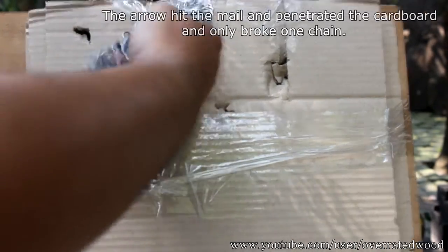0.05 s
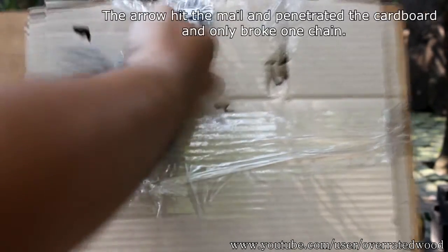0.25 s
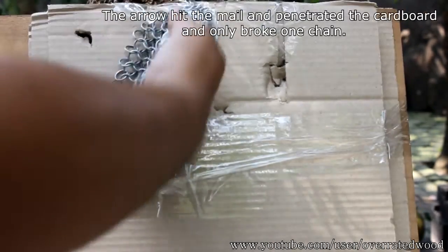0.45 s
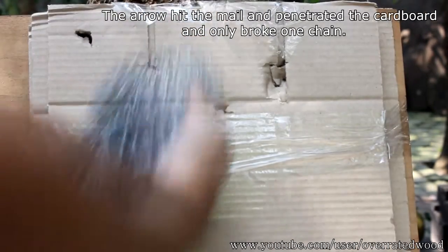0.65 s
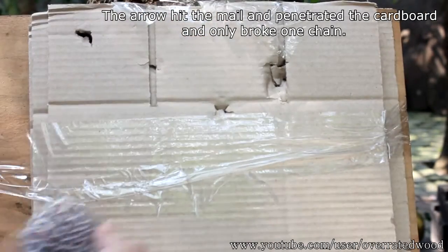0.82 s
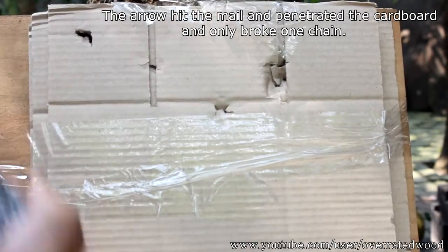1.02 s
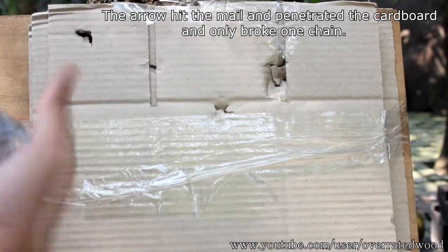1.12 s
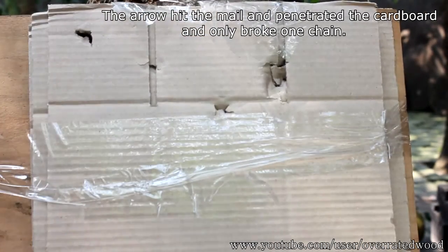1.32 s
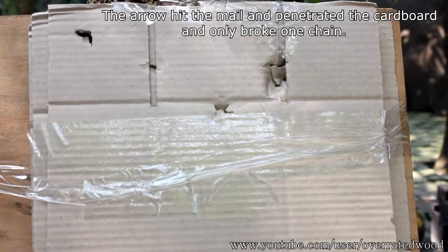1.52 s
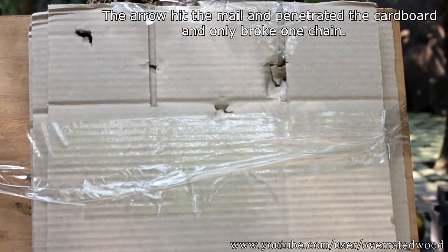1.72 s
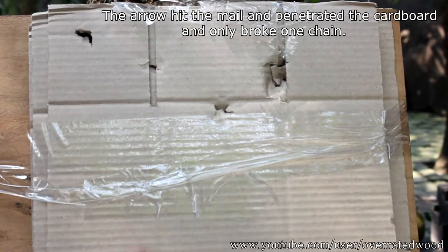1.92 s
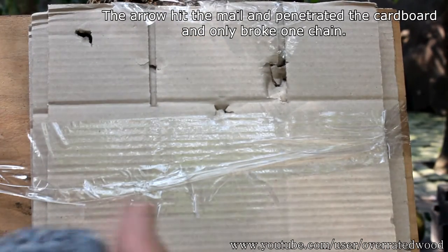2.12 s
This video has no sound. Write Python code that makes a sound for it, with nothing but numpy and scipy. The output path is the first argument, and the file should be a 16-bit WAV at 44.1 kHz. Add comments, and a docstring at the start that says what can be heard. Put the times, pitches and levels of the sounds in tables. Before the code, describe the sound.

Steel ring mesh dragged from cardboard, rasping, knocking and snapping free, then bright metallic jingling

```python
"""Chainmail dragged off a card target

Outdoors, with the microphone close to a hand that drags a piece of chainmail off a cardboard target.
Steel rings scrape (clumped grains over hiss) and snag (short noise bursts) on the card, which gives one
heavy thump among small knocks (damped modes) as the mail tears free. Then the mail jingles (struck ring
modes, ticks and hiss) in the hand as it is carried away. Far off, traffic rumbles and an engine hum fades."""
import sys
import numpy as np
from scipy import signal
from scipy.fft import rfft, irfft, next_fast_len
from scipy.io import wavfile
from scipy.ndimage import map_coordinates

SR = 44100
rng = np.random.default_rng(int(sys.argv[2]) if len(sys.argv) > 2 else 0)


def generate_wav(sig):
    """Save sig (samples, or channels by samples) to the path in sys.argv[1] as 16-bit PCM at SR."""
    pcm = np.round(np.clip(np.atleast_2d(sig).T, -1, 1) * 32767).astype(np.int16)
    wavfile.write(sys.argv[1], SR, pcm)


def boost(x):
    """Linear amplitude factor 10**(x/20) for a level x in decibels (scalar or array-like)."""
    u = np.asarray(x, float) / 20
    return 10 ** u


N = 94815
TOP_HZ = 15800  # upper edge of the band


def unit(x):
    """Scaled to rms 1."""
    return x / np.sqrt(np.mean(x ** 2) + 1e-20)


def coloured(x, points):
    """Minimum-phase filter: x shaped by (Hz, dB) points on a log frequency axis, with no pre-ringing."""
    m = 2 * next_fast_len(N // 2 + 4096)
    hz, db = np.transpose(points)
    log_hz = np.log(np.fft.rfftfreq(m, 1 / SR) + 1)
    log_gain = np.interp(log_hz, np.log(hz), db) * np.log(10) / 20
    # folding the cepstrum onto positive time makes the filter causal
    cepstrum = irfft(log_gain, m)
    cepstrum[1:m // 2] *= 2
    cepstrum[m // 2 + 1:] = 0
    return irfft(rfft(x, m) * np.exp(rfft(cepstrum)), m)[:N]


def wobble(rate):
    """A smooth random curve through normal-distributed knots, rate knots a second."""
    knots = rng.standard_normal(int(N * rate / SR) + 4)
    return map_coordinates(knots, [np.arange(N) * rate / SR])


def swell(start, rise, hold, release):
    """Rise, hold and exponential release, peak 1; times in seconds, release per 20 dB."""
    t = np.arange(N) / SR - start
    up = np.clip(t / rise, 0, 1) ** 1.5
    return up * np.exp(-np.log(10) * np.clip(t - rise - hold, 0, None) / release)


def damped_modes(start_s, hz, gain, t60, size, attack_s=.0001):
    """Struck resonances: a sum of exponentially damped sines, each cut to size samples."""
    t = np.arange(size) / SR
    decay = boost(-60 * t / t60[:, None])
    attack = 1 - np.exp(-t / attack_s)
    rows = gain[:, None] * decay * attack * np.sin(2 * np.pi * hz[:, None] * t)
    at = np.round(start_s * SR).astype(int)[:, None] + np.arange(size)
    return np.bincount(at.ravel(), rows.ravel(), N + size)[:N]


def contacts(per_s, spread_db):
    """Tiny collisions at random moments, either sign, their sizes scattered in dB."""
    count = int(per_s * N / SR)
    at = rng.uniform(0, N - 1, count).astype(int)
    size = boost(spread_db * rng.standard_normal(count))
    return at, size * rng.choice([-1, 1], count)


# Spectrum of the open air around the microphone. Each row: frequency in Hz, relative density in dB per Hz.
AIR_SPECTRUM = [(15, -65), (30, -24), (100, -4), (145, -3), (270, -6), (450, -13), (900, -16), (1950, -25),
                (9000, -39), (12000, -80)]
AIR_DB = -42  # rms, about which the level wobbles
HUM_HZ, HUM_HALF_WIDTH_HZ = 84.4, 12  # half amplitude this far from the centre
HUM_START_DB, HUM_FADE_DB_PER_S = -43.5, 14


def air():
    """Far rumble and outdoor hiss, a little unsteady, with the narrow-band hum of a far engine moving off."""
    m = next_fast_len(N)
    resonance = 1 / (1 + ((np.fft.rfftfreq(m, 1 / SR) - HUM_HZ) / HUM_HALF_WIDTH_HZ) ** 2)
    hum = unit(irfft(rfft(rng.standard_normal(m)) * resonance, m)[:N])
    hum = hum * boost(HUM_START_DB - HUM_FADE_DB_PER_S * np.arange(N) / SR)
    rumble = unit(coloured(rng.standard_normal(N), AIR_SPECTRUM))
    return hum + boost(AIR_DB + .9 * wobble(6.2)) * rumble


YARD_DB, YARD_T60_S = -17.5, 0.082


def yard(near):
    """Short answer from the ground and walls: a decaying noise tail that starts 2 ms after each sound."""
    t = np.arange(SR // 5) / SR
    tail = rng.standard_normal(len(t)) * boost(-60 * t / YARD_T60_S) * (t > .002)
    tail = tail / np.linalg.norm(tail)
    return boost(YARD_DB) * signal.fftconvolve(near, tail)[:N]


# Knocks on the card panel. Each row: start in seconds, relative level in dB.
KNOCKS = [(.2445, -19), (.3393, 5), (0.3562, -16), (.429, -20.5), (.7555, -15), (.764, -15)]
# Modes of the card panel. Each row: frequency in Hz, relative level in dB, decay by 60 dB in seconds.
PANEL_MODES = [(312.4, -12, 0.11), (432, 4.5, 0.022), (547, -7, .025), (790, -16.5, 0.056),
               (1100, -14.5, 0.038), (2060, -20, .02)]
# A small panel radiates little bass. Each row: frequency in Hz, gain in dB.
PANEL_BASS_LOSS = [(30, -24), (120, -6), (230, -4), (330, 0)]


def thumps():
    """Each knock pulls the panel in first (negative swing) and lets its modes ring."""
    rows = [(s, hz, knock_db + mode_db, t60)
            for s, knock_db in KNOCKS for hz, mode_db, t60 in PANEL_MODES]
    s, hz, db, t60 = np.transpose(rows)
    ringing = damped_modes(s, hz, boost(db - 4.5), t60, size=4000, attack_s=0.0011)
    return coloured(-ringing, PANEL_BASS_LOSS)


# Rings dragged over the card. Each row: start in seconds, rise in seconds, hold in seconds,
# level of the scrape band in dB, scrape pitch in Hz.
STROKES = [(0, .01, .045, -41, 2000), (.06, .02, .14, -50, 1500), (0.199, 0.044, .045, -37, 1500),
           (0.294, .015, 0.036, -32, 2500), (.346, .005, .005, -27, 1800), (.362, .004, .01, -34.5, 1200),
           (.398, .01, .065, -43, 1500), (.495, .01, .09, -48, 2500), (.592, .03, .011, -27, 3800),
           (0.637, .005, .014, -28.5, 3500), (.66, .03, .045, -35, 2200), (.725, 0.028, .035, -30, 2400),
           (.80, 0.0055, .035, -41, 2500), (0.865, .002, .01, -40, 2600), (0.918, .002, .022, -44, 2500),
           (1.158, .003, 0.023, -47, 4500)]
# Drumming of the card under a stroke. Each row: frequency in Hz, relative level in dB.
CARD_DRUMMING = [(180, -32.5), (300, -6.5), (450, 0.5), (650, -1.5), (1000, -7), (1800, -17)]
SCRAPES_PER_S, SCRAPE_SPREAD_DB, SCRAPE_HISS = 2500, 4.5, .9  # hiss is rms against grains at 1
SCRAPE_OCTAVES, SCRAPE_SKIRT_DB = .85, -20  # width of the band around the pitch; broad skirt above it
STROKE_RELEASE_S = .028  # per 20 dB
# drumming against the scrape band at the pivot pitch; light, bright strokes drum less
DRUM_DB, DRUM_DB_PER_OCTAVE, DRUM_PIVOT_HZ = 3.5, -9, 2000


def scrape():
    """Clumped grains over hiss, coloured stroke by stroke; the same drag drums the card."""
    at, size = contacts(SCRAPES_PER_S, SCRAPE_SPREAD_DB)
    grains = unit(np.bincount(at, size, N))
    hiss = SCRAPE_HISS * rng.standard_normal(N)
    rub = boost(2.4 * wobble(120)) * (grains + hiss)
    drum = unit(coloured(rub, CARD_DRUMMING))
    out = np.zeros(N)
    m = 2 ** 14  # samples given to one stroke
    f = np.fft.rfftfreq(m, 1 / SR) + 1
    for s, rise, hold, db, hz in STROKES:
        span = slice(int(s * SR), int(s * SR) + m)
        peak = np.exp(-.5 * (np.log2(f / hz) / SCRAPE_OCTAVES) ** 2)
        skirt = boost(SCRAPE_SKIRT_DB) * f ** 2 / (f ** 2 + hz ** 2)
        rasp = unit(irfft(rfft(rub[span]) * (peak + skirt), m))
        drum_db = DRUM_DB + DRUM_DB_PER_OCTAVE * np.log2(hz / DRUM_PIVOT_HZ)
        stroke = boost(db) * swell(s, rise, hold, STROKE_RELEASE_S)[span]
        out[span] += stroke * (rasp + boost(drum_db) * drum[span])
    return out


# A ring snags on the card and snaps free. Each row: start in seconds, peak in dB, centre frequency in Hz.
SNAPS = [(.0358, -19, 12000), (0.0383, -15, 4500), (.0512, -13, 6960), (.176, -21.5, 3970),
         (.239, -13, 11000), (0.2454, -10.5, 2930), (.352, -13, 2500), (.3541, -2.5, 2080),
         (.4248, -17, 1500), (.471, -22, 2500), (0.4795, -20, 5500), (.5175, -29, 4500), (0.56, -16, 4200),
         (.570, -20, 4000), (.5805, -19, 11000), (.588, -23, 13000), (.595, -22, 2000), (0.6059, -6, 9100),
         (0.6122, -11, 4970), (0.6194, -9, 4500), (0.6254, -7.5, 4000), (0.6316, -7, 3570),
         (.6398, -11, 10000), (.642, -6, 4000), (.6427, 0.5, 10000), (0.6487, -3.5, 4700),
         (0.7253, -12, 11100), (.734, -16, 3400), (0.784, -13, 8100), (0.814, -18, 6000), (.868, -14, 1500),
         (.872, -19, 6000), (0.9216, -15, 4000), (.939, -21, 6000), (1.0934, -8, 13000),
         (1.0966, -10, 12000), (1.16, -24, 4200), (1.3455, -14, 9450)]
SNAP_T60_S = .0038


def snags():
    """Each snap is a burst of noise, a few milliseconds long, around its own pitch."""
    out = np.zeros(N + SR)
    t = np.arange(800) / SR
    f = np.fft.rfftfreq(len(t), 1 / SR) + 1
    shape = boost(-60 * t / SNAP_T60_S) * (1 - np.exp(-t / .0002))
    for s, db, hz in SNAPS:
        tone = .35 + np.exp(-(np.log(f / hz) / 0.41) ** 2)
        noise = rfft(rng.standard_normal(len(t)))
        burst = shape * irfft(noise * tone * (f > 900), len(t))
        out[round(s * SR):][:len(t)] += boost(db) * burst / np.abs(burst).max()
    return out[:N]


# The mail is shaken and rings knock each other. Each row: start in seconds, rise in seconds,
# hold in seconds, release in seconds per 20 dB, relative level in dB.
SHAKES = [(0, 0.034, 0.12, 2.3, -40.5), (0.198, .1, .06, 0.14, -28), (0.598, 0.019, 0.036, 0.17, -28),
          (0.672, .08, .04, 0.17, -29.5), (.86, .01, 0.11, 0.3, -41), (1.084, 0.008, 0.016, 0.04, -30.5),
          (1.11, 0.07, 0.046, 0.15, -29), (1.268, .014, .042, 0.04, -18.5), (1.338, 0.007, 0.016, .05, -23),
          (1.432, .002, .004, .025, -32), (1.53, 0.075, 0.07, .1, -29.5), (1.885, .08, .05, .2, -40),
          (2.045, .012, 0.02, 0.05, -33), (2.095, 0.006, 0.018, .05, -35)]
# Mode families of one ring. Each row: typical frequency in Hz, scatter from ring to ring as a share,
# relative level in dB, typical decay by 60 dB in seconds.
RING_MODES = [(4500, .03, -14, .06), (9750, .035, -.4, .04), (12000, 0.076, -10, 0.017),
              (14850, .03, 1.2, .045)]
# Single rings that sing out. Each row: start in seconds, frequency in Hz, level in dB,
# decay by 60 dB in seconds.
SINGING_RINGS = [(.4245, 10300, -14, .012), (1.938, 9940, -38, 0.15), (1.975, 14750, -30, 0.12),
                 (2.064, 9830, -27, 0.089), (2.067, 10150, -30, 0.074), (2.1, 9100, -33, .1)]
# Spectrum of ticks and sliding hiss. Each row: frequency in Hz, gain in dB.
TICK_SPECTRUM = [(1500, -30), (3500, -21), (8000, -12), (10000, -5), (15500, -4)]
REST_DB = -46  # the mail never hangs quite still; on the scale of the shakes
CONTACTS_PER_S, CONTACT_SPREAD_DB = 2200, 3.8
RINGING_DB, TICK_DB, SLIDE_SHARE = -2.5, -3, 1.2  # slide is rms against ticks at 1, before colouring


def jingle():
    """Every contact ticks and sets one mode of one ring ringing; sliding rings hiss."""
    power = boost(2 * REST_DB)
    for *shape, db in SHAKES:
        power = power + (boost(db) * swell(*shape)) ** 2
    shake = np.sqrt(power)
    at, size = contacts(CONTACTS_PER_S, CONTACT_SPREAD_DB)
    family = rng.integers(len(RING_MODES), size=len(at))
    hz, scatter, db, t60 = np.array(RING_MODES)[family].T
    hz = hz * np.exp(scatter * rng.standard_normal(len(at)))
    hz = TOP_HZ - np.abs(TOP_HZ - hz)  # modes above the band are mirrored back into it
    t60 = t60 * np.exp(0.35 * rng.standard_normal(len(at)))
    gain = size * boost(db)
    # the energy of all decays together gives an rms near 1 before the shaking is applied
    gain = gain / np.sqrt(np.sum(gain ** 2 * t60) * SR / (4 * np.log(1000) * N))
    gain = gain * shake[at] * boost(RINGING_DB)
    ringing = damped_modes(at / SR, hz, gain, t60, size=1000)
    slide = SLIDE_SHARE * rng.standard_normal(N)
    ticks = unit(coloured(unit(np.bincount(at, size, N)) + slide, TICK_SPECTRUM))
    s, single_hz, single_db, single_t60 = np.transpose(SINGING_RINGS)
    singles = damped_modes(s, single_hz, boost(single_db), single_t60, size=4000, attack_s=0.00092)
    return ringing + boost(TICK_DB) * shake * ticks + singles


def scene():
    """All close sounds, their short answer from the yard, and the open air behind; one channel."""
    near = jingle() + scrape() + snags() + thumps()
    return (near + yard(near) + air())[None]


def low_pass(x):
    """Removes everything above the highest recorded frequency."""
    return signal.sosfilt(signal.butter(12, 16820, fs=SR, output="sos"), x)


def record(dry):
    """The microphone's signal: band limited, then softly clipped at full scale."""
    m = next_fast_len(N)
    in_band = np.fft.rfftfreq(m, 1 / SR) < TOP_HZ
    x = irfft(rfft(dry, m, axis=1) * in_band, m, axis=1)[:, :N]
    x = x / (1 + np.abs(x) ** 8) ** (1 / 8)
    return low_pass(x)


dry = scene()
out = record(dry)
generate_wav(out)
```